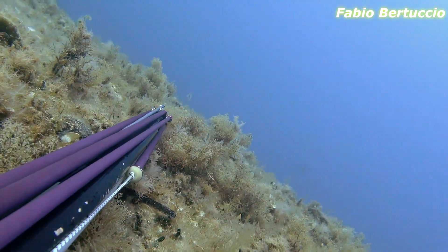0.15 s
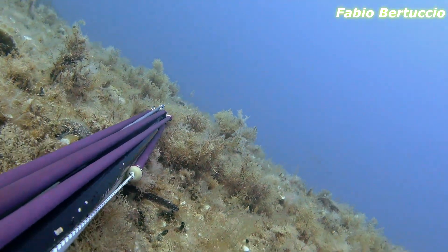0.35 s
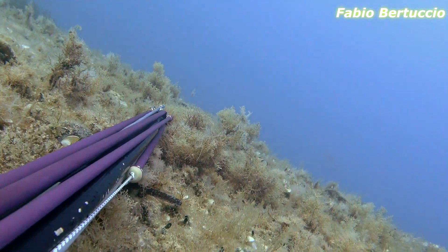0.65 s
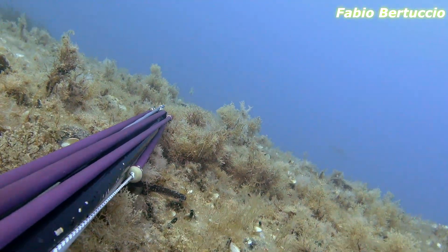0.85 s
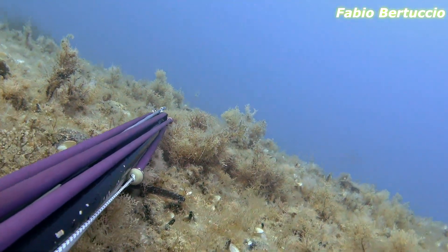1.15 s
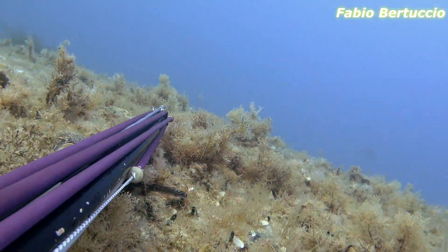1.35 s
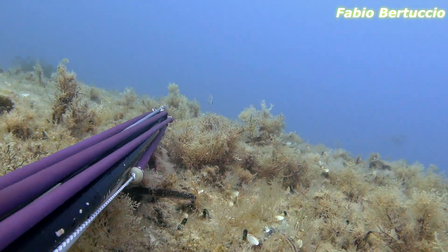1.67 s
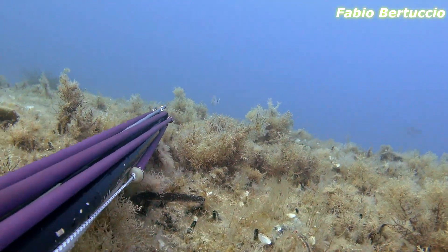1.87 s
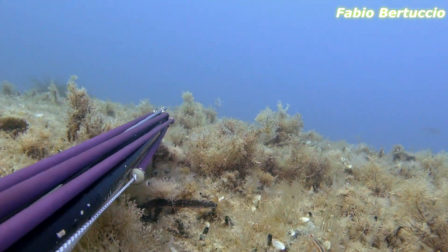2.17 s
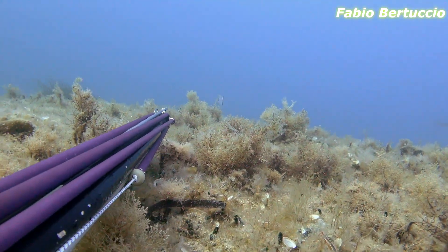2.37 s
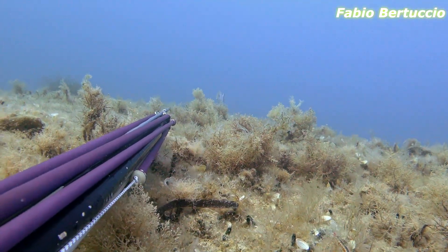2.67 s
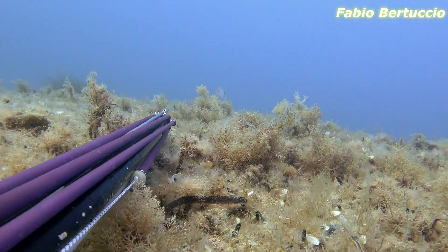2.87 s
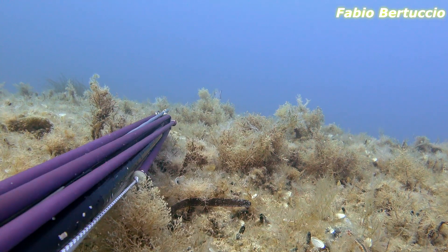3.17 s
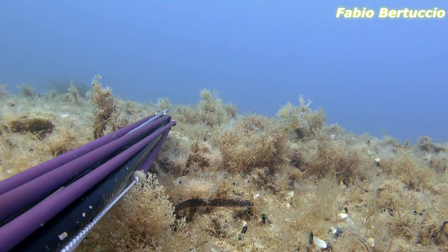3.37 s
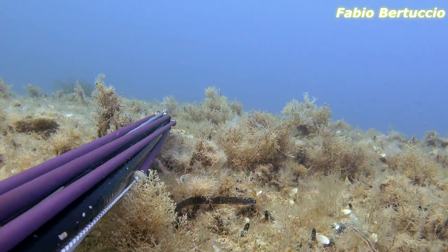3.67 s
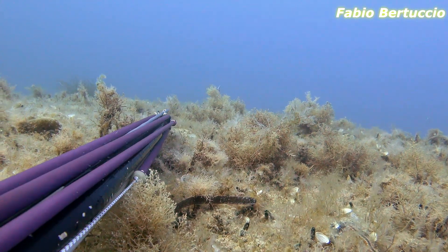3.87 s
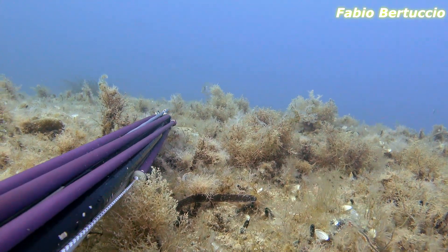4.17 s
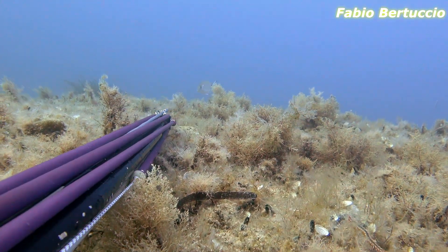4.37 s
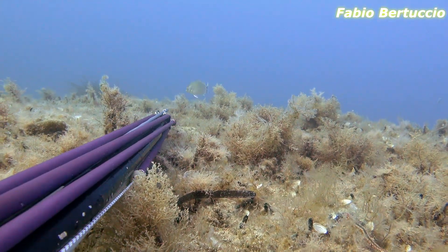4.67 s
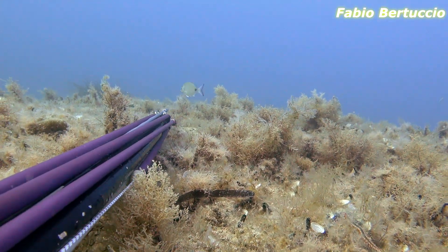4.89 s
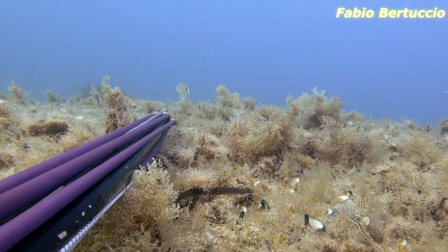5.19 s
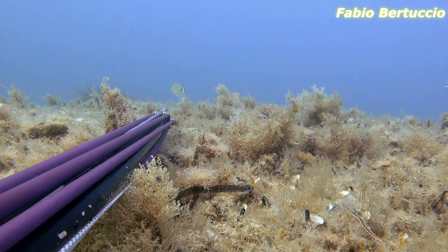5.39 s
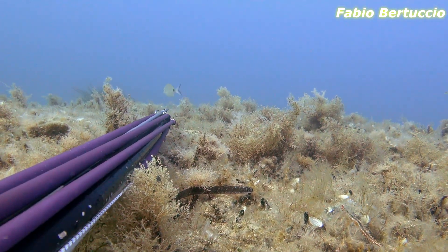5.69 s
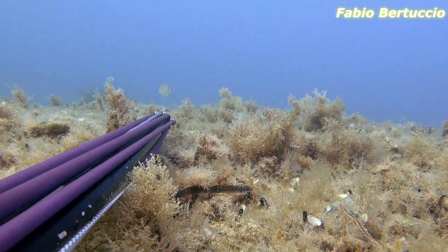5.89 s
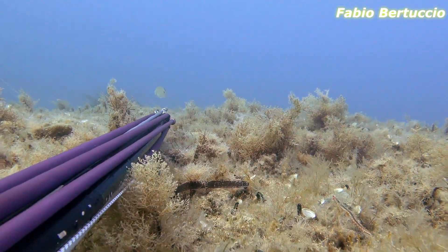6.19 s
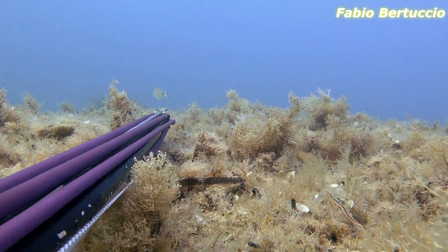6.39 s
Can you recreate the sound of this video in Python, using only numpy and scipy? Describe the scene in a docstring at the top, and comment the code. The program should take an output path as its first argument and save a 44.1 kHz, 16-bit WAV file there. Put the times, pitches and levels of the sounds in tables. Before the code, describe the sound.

Underwater over a reef, heard from inside a camera housing, shrimp snap and crackle near and far above a faint hiss and low water rumble. About a second in, gear drags along the housing and scrapes hard once, making the shell ring briefly and shudder. A handful of soft, hollow taps follows. The snapping and water then carry on, with one last faint rub near the end.

```python
"""Under water over a reef, heard from inside a camera housing. From the start, shrimp snap near and far
over a faint hiss and the rumble of water round the shell. Just before 1 s gear drags along the housing,
then scrapes hard once, making the shell sing, and the jolted housing rocks on its mount. Soft, hollow
taps follow from 1.7 to 2.5 s. Snaps and water carry on, joined by a last faint drag at 6.1 s.
The two microphones hear each resonance of the shell at their own level and phase."""
import sys
import numpy as np
from scipy.fft import rfft, irfft, next_fast_len
from scipy.io import wavfile
from scipy.ndimage import map_coordinates

SR = 44100
rng = np.random.default_rng(int(sys.argv[2]) if len(sys.argv) > 2 else 0)


def master_out(mix):
    """Clip the mix to full scale and print it as 16-bit PCM to the path in sys.argv[1]."""
    frames = np.transpose(np.atleast_2d(mix))
    ceiling = np.clip(frames, -1, 1)
    pcm = np.round(ceiling * 32767).astype(np.int16)
    wavfile.write(sys.argv[1], SR, pcm)


N = 288414

# the shell's ring under a scrape: f/Hz, width/Hz, left/dB, right/dB, left lead/rad
SHELL_MODES = [(160, 33, -25, -13, 3), (255, 41.8, -30.5, -31.5, -15.5), (356.4, 74, -29.5, -25, 1.5),
               (510, 55.5, -26, -28.5, 6.5), (566, 55.8, -8.5, -9, 4), (703, 64.5, -17.5, -16.5, 1.5),
               (859, 39.82, -8, -7.5, -1.35), (927.3, 28.87, -12.5, -17, 3.5), (1184, 73.5, -9, -9.5, 4.5),
               (1290, 30, -10.5, -9, -2.5), (1490, 76, -21.5, -15.5, 3.5), (1865, 140, -21, -19.5, 1.66),
               (2308.6, 55, -28.5, -25.5, 3), (2490, 40, -15, -23.5, -4), (2697, 91, -12.5, -15.5, -2),
               (3380, 370, -29, -31.5, 3), (4067, 293, -32.5, -35.5, 1), (4582, 76, -19.5, -19.5, 1.4937),
               (5281.5, 340, -31.5, -23, 1.7), (6050, 1100, -38.5, -32, 1.77), (9967, 680, -40, -41.5, -5),
               (11700, 1400, -45.5, -42.5, 2.5)]
# the hard scrape: t/s, force/dB, brightness/dB, ring level/dB, ring f/Hz
SCRAPE = [(1.021, -25.5, -7, -50, 900), (1.025, 3.5, -3, -33, 900), (1.035, 3, 2.5, -17, 962),
          (1.047, 5, 3.5, -12.5, 897.5), (1.054, 7, 0.5, -12, 900), (1.064, 3.5, -2, -4.5, 880),
          (1.075, 2, -3.5, -15, 940), (1.082, 1, -0.5, -16.5, 954), (1.091, 4.5, -3, -24, 901.7),
          (1.101, -0.5, -6, -10.5, 929), (1.111, -4.5, -4.5, -22, 920), (1.128, -30.5, -10.5, -38.5, 930)]
# short slips either side of it: t/s, length/s, force/dB, brightness/dB
SLIPS = [(0.987, 0.024, -10, -9), (1.139, .0071, 0, -10.5), (1.162, 0.0098, -5.5, -13.5),
         (1.193, 0.013, -6, -18), (1.214, 0.015, -11.5, -9), (1.266, 0.03, -15, -15)]


def scrape():
    """Gritty friction drives the shell; pressed hard it locks on to the main resonance, which sings."""
    slip_ring_db, slip_hz = -27.5, 910  # a slip's ring: level relative to its force, and pitch
    t = np.arange(N) / SR
    force_db, bright_db, ring_db, pitch_hz = curves(SCRAPE)
    scraping = (t > SCRAPE[0][0]) & (t < SCRAPE[-1][0])
    bands = [between(SHELL_MODES, *hz) for hz in [(0, 1600), (1600, 3700), (3700, 16000)]]
    tilt = lambda db: np.array([0 * db, db + 1, db + 0.3])  # brightness moves the upper two bands
    force = amp(force_db + tilt(bright_db)) * scraping
    ring = amp(ring_db) * scraping
    for start, length, db, slip_bright_db in SLIPS:
        progress = np.clip((t - start) / length, 0, 1)
        press = np.abs(np.sin(np.pi * progress ** 0.77)) * (t < start + length)
        force += amp(db + tilt(slip_bright_db))[:, None] * press ** 0.17
        ring += amp(db + slip_ring_db) * press ** 0.6
    grit = force * amp(1.9 * wobble(450)) * rng.standard_normal((3, N))
    phase = 2 * np.pi * np.cumsum(np.where(scraping, pitch_hz, slip_hz) + 12 * wobble(200)) / SR
    ring *= amp(wobble(300))
    right = amp(-5 + 2.43 * wobble(120)) * np.sin(phase + 0.92 + 0.38 * wobble(90))
    song = ring * np.array([np.sin(phase), right])
    low_ring = amp([[-19], [-29]]) * ring * amp(2.83 * wobble(90))  # a lower resonance joins in
    song += low_ring * np.sin(2 * np.pi * np.cumsum(572 + 15 * wobble(100)) / SR)
    return sum(rings(drive, modes) for drive, modes in zip(grit, bands)) + song


# the broad body of the dragging gear: f/Hz, width/Hz, left/dB, right/dB, left lead/rad
GEAR_MODES = [(611, 153.7, -8, -2.5, 3.5), (810, 200, 6, 3.5, 3), (1190, 710, -4.5, -10.5, 3),
              (1711.8, 343, -12, -5, -1.5), (2244, 330, -2.5, -7, -3), (2912, 760, -11, -18.5, -5.5)]
# light strokes along the shell: t/s, length/s, start force/dB, end force/dB, brightness/dB
STROKES = [(0.751, .12, -28, -29, -7), (0.866, .3, -26, -30, -16), (1.17, 0.12, -25.5, -20.5, -10),
           (1.4, 0.86, -56, -47.5, -1), (6.1, 0.407, -45.5, -38.5, -1.5)]


def drag():
    """Gear slides lightly along the shell: patchy grit in broad resonances."""
    attack_s, release_t60_s = 0.013, 0.27
    t, force = np.arange(N) / SR, np.zeros((2, N))
    for start, length, start_db, end_db, bright_db in STROKES:
        db = np.interp(t, [start, start + length], [start_db, end_db])
        db -= 60 * np.maximum(t - start - length, 0) / release_t60_s
        attack = np.clip((t - start) / attack_s, 0, 1)
        force = np.maximum(force, amp(db + np.c_[[0, bright_db]]) * attack)
    grit = force * amp(3.32 * wobble(40) + 1.3 * wobble(400)) * rng.standard_normal((2, N))
    low, high = between(GEAR_MODES, 0, 1500), between(GEAR_MODES, 1500, 9000)
    rub = rings(grit[0], low) + rings(grit[1], high)
    return lowpass(rub, hz=3500, poles=2)  # light sliding is dull


# soft taps on the shell: t/s, force/dB, upper band offset/dB
TAPS = [(1.666, -15, 3), (1.877, -9.5, -6), (1.887, -18, -7), (1.961, -14, 4), (1.972, -14, -1),
        (1.985, -20, 4), (2.053, -16, 3), (2.063, -14, -6.5), (2.075, -16, 3), (2.141, -13, 0),
        (2.153, -13, 3), (2.25, -11.5, 4), (2.52, -22.5, -9)]
# a tap's lower and upper ring: f/Hz, width/Hz, left/dB, right/dB, left lead/rad
TAP_LOWER_MODES = [(255, 60, -15, -4, .2), (600, 60.4, 6, 7, 0.36), (745, 67, 0, -19, 2.5)]
TAP_UPPER_MODES = [(1210, 190, -7, 6.5, 3.5), (1289, 65, 9.5, 4, -2), (1480, 103, -6.5, -5, 4)]


def taps():
    """Each tap is a soft, gritty push. The grip passes only two bands of it, so the ring is hollow."""
    times, db, upper_db = np.transpose(TAPS)
    lower = filtered(blows(times, db, t60_s=0.0044), lambda f: resonance(f, 570, 335))
    upper = filtered(blows(times, db + upper_db, t60_s=0.005), lambda f: resonance(f, 1250, 430))
    return rings(lower, TAP_LOWER_MODES) + rings(upper, TAP_UPPER_MODES)


# the foreground snaps: t/s, force/dB, low ring offset/dB
NEAR_SNAPS = [(.363, -44, 27), (.4996, -17.5, -4), (0.5164, -18, 2), (.589, -18, -0.5), (.654, -19, -1),
              (1.3292, -17, -4), (1.508, -23, 8.5), (1.5722, -16, -7.5), (1.611, -22, 14.5),
              (1.7035, -23.5, -5), (1.7991, -16.5, -12.5), (1.912, -8, -5), (1.947, -20, 6),
              (2.1046, -19, -13), (2.2946, -11.5, -23), (2.306, -28, -11), (2.863, -22, 4.5),
              (2.9004, -15.5, -12), (2.922, -23, -10), (3.1213, -19, -20), (3.1342, -21.5, -10),
              (3.1834, -20.5, -6.5), (3.416, -16.5, 4), (3.456, -24, 8), (3.465, -18, 4.5),
              (3.6772, -23, 3), (3.808, -33.5, 16.5), (3.817, -15.5, 5), (3.8885, -12.5, 6.5),
              (3.984, -36, 18.5), (4.026, -19.5, -20), (4.2325, -19.5, 0), (4.5592, -18.5, 3),
              (4.9454, -15, -14), (5.3555, -19.5, -2), (5.469, -17, -1.5), (5.519, -28.5, 17),
              (5.57, -22.5, -5.5), (5.6322, -20, -2), (5.6667, -21, 4), (5.7552, -18.5, -13),
              (5.948, -16, 7), (6.1096, -18.5, -9), (6.1453, -13.5, -17), (6.2469, -18.5, -12),
              (6.4518, -19.5, 6.5)]
# a snap's low ring and bright crack: f/Hz, width/Hz, left/dB, right/dB, left lead/rad
SNAP_LOW_MODES = [(1894, 110, -4, -4, 0.66), (2870, 330, -5.5, -4, -1.7)]
SNAP_HIGH_MODES = [(4550, 277.3, -7.5, -5.5, 0.77), (5686, 420, -1, 3.5, 1.86), (6759, 610, -1, 3.5, 1.83),
                   (7950, 1400, -12, -14.5, 1.18), (11360, 3600, -15, -17, -1.2),
                   (14500, 2100, -36, -28, 0.26)]


def shrimp():
    """Snaps arrive through the water and ring the housing: near ones singly, far ones as a crackle."""
    far_count, far_base_db, far_ceiling_db = 1700, -37, -25
    near_s, near_db, low_db = np.transpose(NEAR_SNAPS)
    far_s, rank, thinness = rng.random((3, far_count)) * [[N / SR], [1], [1]]
    clumps_db = (3 * wobble(14) + 2.5 * wobble(45))[(far_s * SR).astype(int)]
    far_db = far_base_db - 2.65 * np.log(rank) + clumps_db  # many faint for each strong
    far_db = np.minimum(far_db, far_ceiling_db)
    times, body_db = np.r_[near_s, far_s], np.r_[near_db, far_db]
    # each snap has its own share of bottom and top
    bottom_db = np.r_[near_db + low_db, far_db - 3 - 14 * thinness]
    top_db = body_db + 2.9 * rng.standard_normal(len(times))
    body = rings(blows(times, body_db, t60_s=0.00614), between(SNAP_HIGH_MODES, 0, 9000))
    top = rings(blows(times, top_db, t60_s=0.00302), between(SNAP_HIGH_MODES, 9000, 16000))
    bottom = rings(blows(times, bottom_db, t60_s=0.0063), SNAP_LOW_MODES)
    return body + top + bottom


# sub-bass swings of the housing: t/s, f/Hz, level/dB, t60/s
SWINGS = [(1.18, 17, -32.5, 2.07), (1.22, 33, -39, 1.3), (2.52, 19, -49.5, 1.7), (2.97, 18, -45, 2.4)]


def rocking():
    """The jolted housing rocks on its mount: slow damped swings, alike in both microphones."""
    out = np.zeros(N)
    for start, hz, db, t60 in SWINGS:
        age = np.maximum(np.arange(N) / SR - start, 0)
        envelope = amp(db - 60 * age / t60) * (1 - np.exp(-age / 0.056))
        out += envelope * np.sin(2 * np.pi * (hz * age + 0.14 * wobble(8)))
    return out


# low swells of rumble and hum in the shell (the scrape's jolt at 1.06 s, otherwise surging water):
# peak t/s, half width/s, rumble/dB, low hum/dB, upper hum/dB
LOW_SWELLS = [(.87, 0.065, -50, -52, -64.5), (1.062, 0.0475, -44, -40.5, -39),
              (1.249, 0.072, -49.5, -46, -53.5), (1.42, 0.045, -53, -55.5, -76),
              (1.7, 0.041, -55.5, -62, -68), (2.27, 0.15, -63, -65.5, -69.5), (2.6, .07, -59, -72.5, -89.5),
              (3.07, 0.067, -58, -52, -63.5), (3.3, 0.1, -69, -66, -79.5), (3.8, .14, -65.5, -63.5, -75),
              (4.2, 0.14, -63.5, -61.5, -77), (4.6, 0.19, -66.5, -63, -74.5), (5.08, .1, -63, -63, -75.5),
              (5.4, 0.064, -63.5, -74.5, -79.5), (6.1, 0.14, -66, -59.5, -72),
              (6.501, 0.17, -65.5, -60, -67)]


def shell_rumble():
    """Flow round the housing gives a deep rumble and two hums; surges and the jolt swell them."""
    calm_db, drift_db = [-65, -72.5, -82.5], [4, 3.5, 1.5]  # rumble, low hum, upper hum
    t = np.arange(N) / SR
    drift = np.array([wobble(7.8), wobble(3.94), wobble(3.6)])
    power = amp(np.c_[calm_db] + np.c_[drift_db] * drift) ** 2
    for peak_s, half_width, *db in LOW_SWELLS:
        power += amp(np.c_[db]) ** 2 * np.exp(-((t - peak_s) / half_width) ** 2)
    rumble_gain, low_gain, upper_gain = np.sqrt(power)
    rumble = noise([(6, -17), (9, -1), (27, -4.5), (45, -2), (65, -18)], channels=2)
    low = noise([(40, -15), (62, -4), (75, 2.5), (92, -7), (130, -22)], channels=2)
    upper = noise([(120, -19), (160, -3.5), (205, -14), (250, -0.5), (285, -9.5), (340, -20.5)],
                  channels=2)
    side = [[1], [-1]]  # the second noise of each pair adds stereo width
    out = rumble_gain * (rumble[0] + 0.25 * rumble[1] * side)
    out += low_gain * (low[0] * amp([[-1.5], [1.5]]) + 0.65 * low[1] * side)
    return out + upper_gain * (upper[0] * amp([[-3], [3]]) + 0.68 * upper[1] * side)


# tone of the hiss, mid and side: f/Hz, relative level/dB
HISS_MID = [(53, -38.5), (90, -9), (139, -3.5), (544, -10), (915, -9.5), (1320, -4), (4000, -20.5),
            (4650, -20), (5070, -23.5), (5650, -15), (6720, -13), (9110, -27.5), (11600, -20.5),
            (15000, -23), (16000, -25)]
HISS_SIDE = [(35, -36.5), (60, -12.5), (437, -6), (1090, -8), (1380, 0), (1620, -8.5), (2470, -8),
             (2770, -15), (4320, -21), (5860, -19.5), (6580, -21), (8710, -33), (11500, -28.5),
             (14900, -33), (16000, -40)]


def hiss():
    """A faint, wide bed of noise, breathing a little."""
    mid = amp(-62 + 0.53 * wobble(3.275) + 0.61 * wobble(25)) * noise(HISS_MID)
    side = amp(-57 + 0.361 * wobble(3) + 0.8 * wobble(25)) * noise(HISS_SIDE)
    return mid + side * [[1], [-1]]


def amp(db):
    """Decibels to gain."""
    return 10 ** (np.asarray(db) / 20)


def curves(rows):
    """One value per sample for each column after the time."""
    times, *columns = np.transpose(rows)
    return [np.interp(np.arange(N) / SR, times, column) for column in columns]


def wobble(rate):
    """A smooth random curve, rate knots a second."""
    return map_coordinates(rng.standard_normal(int(N * rate / SR) + 4), [np.arange(N) * rate / SR])


def filtered(x, response):
    """x shaped by a complex frequency response."""
    size = next_fast_len(N + SR // 2)
    return irfft(rfft(x, size) * response(np.fft.rfftfreq(size, 1 / SR)), size)[..., :N]


def lowpass(x, hz, poles):
    """A gentle treble roll-off."""
    return filtered(x, lambda f: 1 / (1 + 1j * f / hz) ** poles)


def resonance(f, hz, width_hz):
    """The band-pass response of one damped resonance."""
    return 1j * f * width_hz / (hz * hz - f * f + 1j * f * width_hz)


def between(modes, low_hz, high_hz):
    """The resonances inside a band."""
    return [mode for mode in modes if low_hz <= mode[0] < high_hz]


def rings(force, modes):
    """What both microphones hear when a force drives resonances of alternating polarity."""
    def response(f):
        out = np.zeros((2, len(f)), complex)
        for k, (hz, width_hz, left_db, right_db, lead) in enumerate(modes):
            mics = amp([[left_db], [right_db]]) * np.exp([[0.5j * lead], [-0.5j * lead]])
            out += (-1) ** k * mics * resonance(f, hz, width_hz)
        return out
    return filtered(force, response)


def noise(points, channels=1):
    """Noise of rms 1, coloured by (f/Hz, level/dB) points on a log axis."""
    hz, db = np.transpose(points)
    colour = lambda f: amp(np.interp(np.log(f + 1), np.log(hz), db, -120, -120))
    x = filtered(rng.standard_normal((channels, N)), colour)
    return x / np.sqrt(np.mean(x ** 2) + 1e-20)


def blows(times, levels_db, t60_s):
    """Short bursts of force: one kick, then a dying tail of random weaker ones."""
    offsets = np.arange(256)
    kicks = 0.29 * rng.standard_normal((len(times), 256)) * amp(-60 * offsets / SR / t60_s)
    kicks[:, 0] = 1
    kicks *= (amp(levels_db) / np.linalg.norm(kicks, axis=1))[:, None]
    at = (np.asarray(times) * SR).astype(int)[:, None] + offsets
    return np.bincount(at.ravel(), kicks.ravel(), N + 256)[:N]


def scene():
    """Handling sounds on the housing, mixed over the reef."""
    rubbing = lowpass(drag() + scrape(), hz=11000, poles=3)  # rubbing has little extreme treble
    return rubbing + rocking() + taps() + shrimp() + shell_rumble() + hiss()


def record(dry):
    """The camera keeps nothing above its band limit."""
    return filtered(dry, lambda hz: hz < 15830)


dry = scene()
out = record(dry)
master_out(out)
```